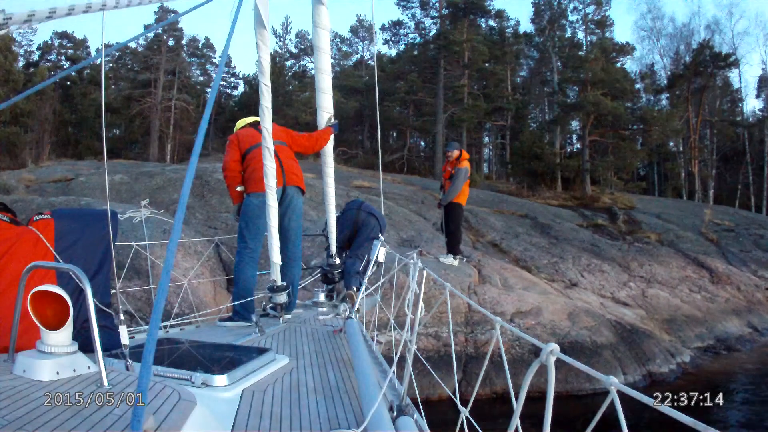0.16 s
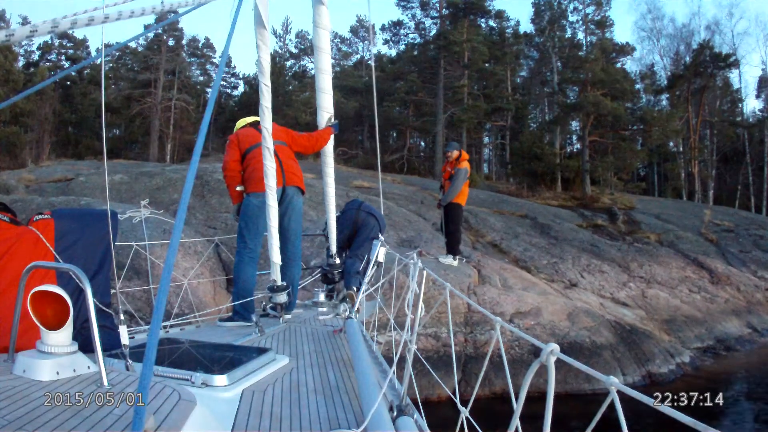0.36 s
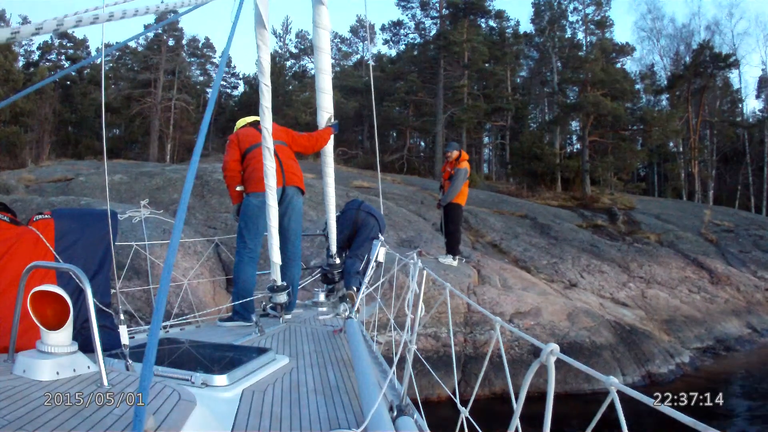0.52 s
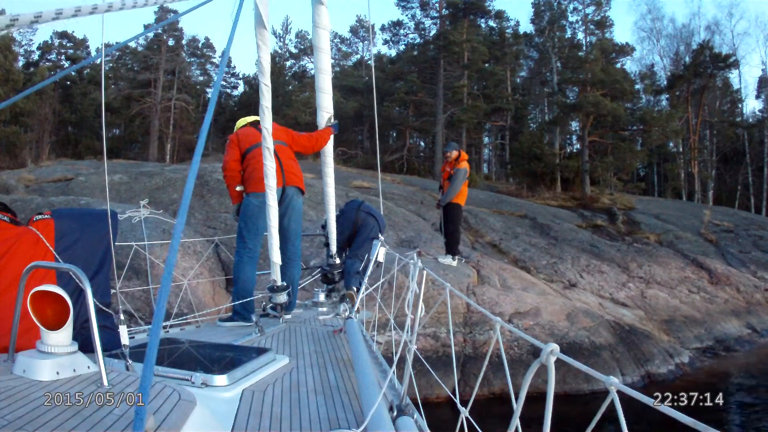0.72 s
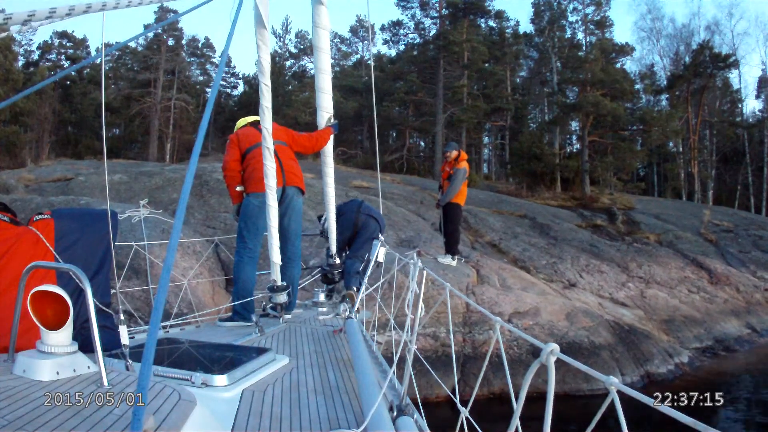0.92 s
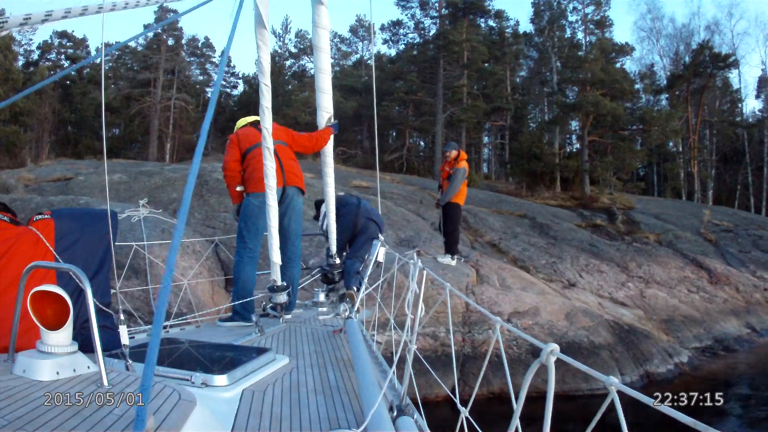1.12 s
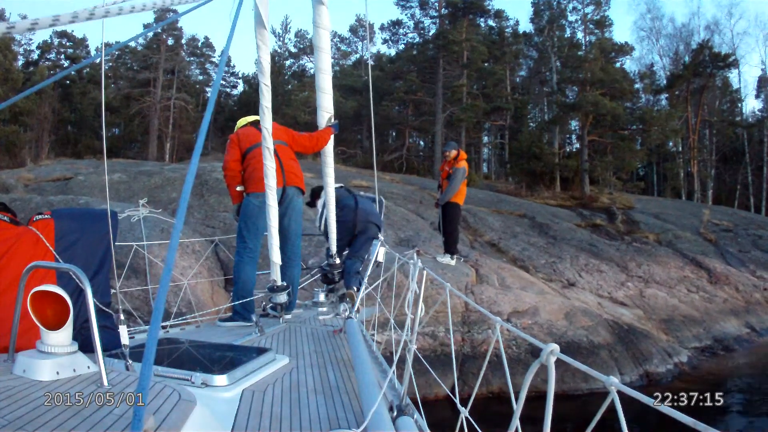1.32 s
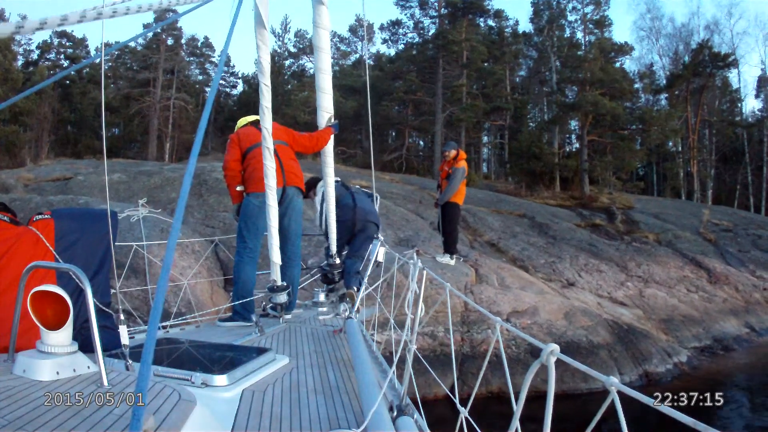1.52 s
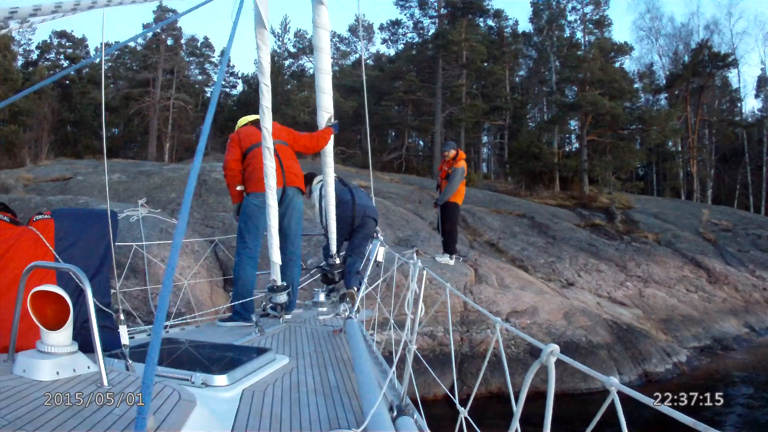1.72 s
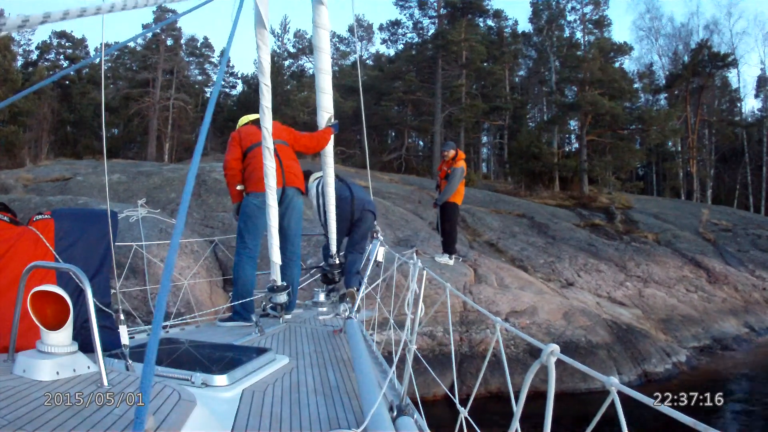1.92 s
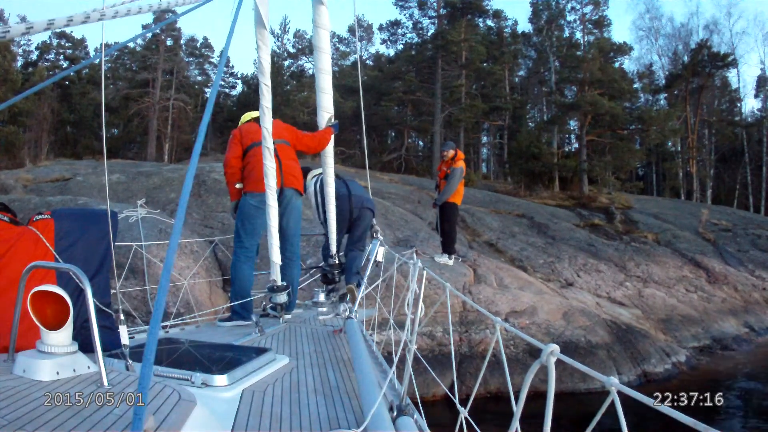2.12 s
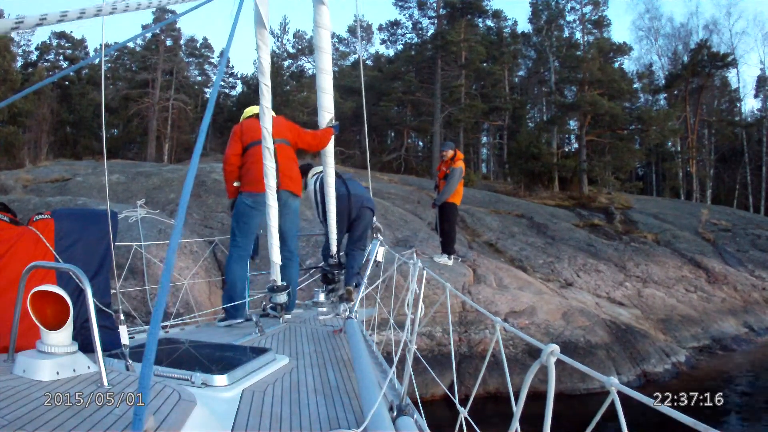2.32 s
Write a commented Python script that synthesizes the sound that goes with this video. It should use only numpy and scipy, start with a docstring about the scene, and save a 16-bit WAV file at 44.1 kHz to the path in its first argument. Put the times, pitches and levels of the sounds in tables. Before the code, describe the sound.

Gear thuds on a yacht's foredeck: a small metal tap over a low shudder, then heavy booming knocks, followed by scattered rail taps that thin out, heard close through the hull over faint water rumble and hiss.

```python
"""A metal tap over a low shudder comes first, then heavy thuds boom in a hull: gear handled on a yacht's foredeck,
heard through the hull by a camera fixed to the boat. Metal taps ring a rail and small parts tick.
Each blow is a click and a rattle exciting decaying modes; noise keeps hull, deck and rail sounding as they die away.
Behind them lie a faint water rumble of resonant noise and the camera's coloured hiss and sine whine."""
import sys
import numpy as np
from scipy import signal
from scipy.fft import rfft, irfft
from scipy.io import wavfile
from scipy.ndimage import uniform_filter1d

SR = 44100
rng = np.random.default_rng(int(sys.argv[2]) if len(sys.argv) > 2 else 0)


def master_out(mix):
    """Clip the mix to full scale and print it as 16-bit PCM to the path in sys.argv[1]."""
    frames = np.transpose(np.atleast_2d(mix))
    ceiling = np.clip(frames, -1, 1)
    pcm = np.round(ceiling * 32767).astype(np.int16)
    wavfile.write(sys.argv[1], SR, pcm)


def decibels_to_gain(level_db):
    """Convert a level in decibels to a linear amplitude gain (20 dB per decade)."""
    exponent = np.asarray(level_db, float) / 20
    return 10 ** exponent


N = 103635

# Deck panel modes: f/Hz, relative level/dB, t60/s
DECK = [(564.5, -3, 0.17), (616.4, 0.5, 0.19), (675, 3.5, 0.035), (729, 3, 0.028), (785, 3, 0.065),
        (821, -21, 0.039), (950, -11.5, 0.042), (1043, -23.5, 0.067), (1140, -21, 0.041), (1300, -17, 0.02),
        (1442, -8, 0.03), (1615, -3.5, 0.05), (1757, -6, 0.064), (1916, -18, 0.2), (1900, -51, 0.079)]
# Upper hull modes: f/Hz, relative level/dB, t60/s
HULL_UPPER = [(224, 1.5, 0.079), (257.1, -3, 0.64), (276.7, 3, 0.24), (341.5, -4.5, 0.47),
              (361.2, -1, 0.21), (455, -7.5, 0.12)]
# Rail modes, low cluster, upper cluster and long ring: f/Hz, relative level/dB, t60/s
RAIL_LOW = [(603, -8, .085), (670, -12, .05), (791, 0, .07), (835, -5, .045)]
RAIL_UPPER = [(1170, -12, .08), (1292, -4, .075), (1367, -11, .11), (1470, -5, .05), (1560, -2, .05),
              (1630, -2, .06), (1732, -3, .05), (1792, -4, .09), (1863, -1, .075), (1947, -2, .085),
              (2040, -14, .05)]
RAIL_RING = [(1562, 0, .3)]


def level(x, db):
    """Root-mean-square normalisation: scales to an rms level in dB re 1."""
    return x * decibels_to_gain(db) / np.sqrt(np.mean(x ** 2))


def curve(rows):
    """Amplitude envelope: rows of t/s, level/dB joined by straight lines in dB."""
    return decibels_to_gain(np.interp(np.arange(N) / SR, *np.array(rows).T))


def walk(per_s):
    """Low-passed noise: a random wander of rms 1, smoothed twice over 1/per_s seconds."""
    k = int(SR / per_s)
    smooth = uniform_filter1d(rng.standard_normal(N), k)
    return level(uniform_filter1d(smooth, k), 0)


def ring(x, hz, t60):
    """Damped oscillator: a complex pole gives one mode that falls 60 dB in t60 (5 ms at least)."""
    decay = np.log(1000) / (max(t60, .005) * SR)
    pole = np.exp(2j * np.pi * hz / SR - decay)
    return signal.lfilter([1], [1, -pole], x).imag


def passband(x, modes):
    """Band limitation: a structure passes little outside the span of its modes."""
    hz = np.array(modes)[:, 0]
    skirt = 1.0436  # frequency ratio by which the band exceeds the outer modes
    band = [hz.min() / skirt, hz.max() * skirt]
    return signal.sosfilt(signal.butter(4, band, "band", fs=SR, output="sos"), x)


def strike(modes, times, dbs, rattle_s, rattle_db):
    """Impact excitation: a click and a fading, grainy rattle drive the modes, scaled to each blow's peak level.

    rattle_s is the rattle's decay constant, rattle_db its mean energy re the click."""
    scatter_db, grain_db = 4.5, 4  # spread of mode levels from blow to blow, and of grain levels
    size = (len(times), 16384)
    span = np.arange(size[1])
    rattle_s = (np.ones(size[0]) * rattle_s)[:, None]
    grain_gain = np.repeat(rng.standard_normal((size[0], 256)), repeats=64, axis=1)  # 64 samples a grain
    grains = level(rng.standard_normal(size) * decibels_to_gain(grain_db * grain_gain), 0)
    fade = np.exp(-span / SR / rattle_s) / np.sqrt(rattle_s * SR / 2)  # unit energy
    push = grains * decibels_to_gain(np.reshape(rattle_db, (-1, 1))) * fade
    push[:, 0] += 1  # the click
    share = decibels_to_gain(scatter_db * rng.standard_normal((size[0], len(modes))))
    blows = sum(decibels_to_gain(db) * share[:, [k]] * ring(push, hz, t60) for k, (hz, db, t60) in enumerate(modes))
    blows = passband(blows, modes)
    blows = blows * decibels_to_gain(np.asarray(dbs))[:, None] / np.abs(blows).max(axis=1, keepdims=True)
    at = (np.asarray(times) * SR).astype(int)[:, None] + span
    return np.bincount(at.ravel(), blows.ravel(), N + size[1])[:N]


def stir(modes, gain):
    """Sustained random excitation: noise keeps the modes sounding under a gain over time."""
    tones = sum(decibels_to_gain(db) * ring(rng.standard_normal(N), hz, t60) for hz, db, t60 in modes)
    return passband(gain * level(tones, 0), modes)


def thuds():
    """Modal response to a blunt impact: a blow with a scrape makes deck panels knock and crackle."""
    # Thuds on the deck: t/s, peak level/dB, treble re peak level/dB, scrape decay constant/s; the faint row at
    # 1.798 s is a light tap, heard through the deck modes
    thud_rows = [(.222, -5.5, -24, 0.012), (0.248, -31, -16, 0.0067), (0.261, -15, -24.5, 0.029),
                 (.295, -19, -27, 0.021), (0.371, -14, -20.5, 0.007), (0.377, -8.5, -24, 0.014),
                 (0.397, -10.5, -25.5, 0.0081), (0.414, -11.5, -25, 0.0048), (.436, -18, -39, 0.047),
                 (0.473, -18, -24, 0.031), (0.496, -23, -38, 0.044), (0.687, -19, -22.5, 0.046),
                 (0.883, -29, -26.5, 0.013), (1.798, -32, -25, 0.0045), (2.304, -43.5, -28, 0.026),
                 (2.319, -35.5, -35, 0.023)]
    # Treble modes of the deck: f/Hz, relative level/dB, t60/s
    treble_modes = [(2650, -14, .02), (2920, -5, .04), (3203, 0, .035), (3400, -2, .03), (3737, -10, .02)]
    # Crackle modes of the deck: f/Hz, relative level/dB, t60/s (raised to 5 ms where shorter)
    crackle_modes = [(4600, 13, .004), (5130, 4, .004), (6300, -14, .003), (9900, -8, .003)]
    t, db, treble, scrape = np.array(thud_rows).T
    parts = ((DECK, 0), (HULL_UPPER, -15), (treble_modes, treble), (crackle_modes, treble - 9.5))
    return sum(strike(modes, t, db + share_db, scrape, rattle_db=14.5) for modes, share_db in parts)


def taps():
    """Modal participation: where the rail is hit sets each cluster's share; the long ring fades unevenly."""
    # Taps on the rail: t/s, peak level of the low cluster before the common -7 dB/dB,
    # then re that peak: upper cluster level/dB, long ring level/dB, treble level/dB
    tap_rows = [(0.116, -25.5, -5.5, -15, -19.5), (0.339, -32, 2, 5.5, -6), (0.436, -14.5, -5, -4, -14.5),
                (0.55, -13, 6.5, -10.5, -10), (0.669, -26, -1, -4, -12.5), (0.713, -8, 5.5, -7.5, -9),
                (0.835, -33, -5, -0.5, -9.5), (0.943, -36.5, -6, 2, -15), (1.039, -13, 2, -13, -16),
                (1.15, -25, 2.5, -12.5, -16.5), (1.231, -12.5, 4.5, -17, -10.5), (1.31, -43.5, 7.5, 5, -24),
                (1.339, -40.5, 9, -4.5, -20), (1.405, -20, 2.5, -9.5, -20), (1.556, -41.5, -4, -14, -15),
                (1.592, -18, 0.5, -16, -17), (1.656, -18.5, 0, -17.5, -22.5), (1.805, -21, 0, -11, -20),
                (1.852, -28.5, -5.5, -7.5, -14), (1.885, -45.5, 10, -15, -5),
                (2.012, -36.5, -1.5, -9.5, -12), (2.18, -57.5, 9, 11.5, -18), (2.226, -38, -2.5, -7.5, -14)]
    # Treble modes of the rail: f/Hz, relative level/dB, t60/s
    treble_modes = [(2945, -4, .06), (3100, -1, .05), (3240, 0, .04), (3400, 0, .03), (3550, -3, .025),
                    (3900, -14, .015), (4300, -11, .02), (4700, -12, .02), (4950, -11, .025),
                    (5330, -9, .03), (5520, -9, .04), (6270, -15, .02)]
    t, db, upper, long, treble = np.array(tap_rows).T
    soft = db < -42  # brushes, more rattle than click
    rattle_s = np.where(soft, .025, .0085)
    blur_db = 12 * soft
    low = strike(RAIL_LOW, t, db, rattle_s, blur_db - 4)
    clusters = ((RAIL_UPPER, upper), (treble_modes, treble))
    bright = sum(strike(modes, t, db + share_db, rattle_s, blur_db + 2.5) for modes, share_db in clusters)
    tail = strike(RAIL_RING, t, db + long, .0085, rattle_db=-12)
    tail = tail * decibels_to_gain(2.5 * walk(per_s=45))
    return decibels_to_gain(-7) * (low + bright + tail)


def ticks():
    """Resonance of small bodies: loose parts tick in high, short modes, a little to one side by level difference."""
    # Ticks: t/s, peak level before panning/dB, top resonance re that peak/dB
    tick_rows = [(0.2215, -51, -15), (0.235, -34.5, -14.5), (0.339, -41.5, -8.5), (0.3745, -52, -9),
                 (0.398, -43.5, -2.5), (0.437, -36.5, -21), (0.49, -48, -9), (0.5033, -35, -11),
                 (0.669, -46.5, 0.5), (0.8365, -49, -15)]
    # Main modes of a small part: f/Hz, relative level/dB, t60/s
    part_modes = [(4250, -4, .012), (4950, -6, .008), (5600, -5, .01), (6800, -9, .005)]
    # Its top modes: f/Hz, relative level/dB, t60/s (raised to 5 ms where shorter)
    top_modes = [(8700, -8, .005), (9600, -3, .012), (13200, -8, .004)]
    t, db, top = np.array(tick_rows).T
    body = strike(part_modes, t, db, .012, rattle_db=-2.5)
    bright = strike(top_modes, t, db + top, .012, rattle_db=17)
    pan_db = np.array([[1], [-1]])  # left, right
    return (body + bright) * decibels_to_gain(pan_db)


def boom():
    """Beating: the two lowest hull modes sound together, each wavering in level and frequency, at rms 1."""
    # Lowest hull modes: f/Hz, relative level/dB, rms frequency waver/Hz
    low_modes = [(134, 0, 4), (161, -2, 7)]
    waver_db, waver_per_s = 2.5, 14
    tones = 0
    for hz, db, waver_hz in low_modes:
        gain = decibels_to_gain(db + waver_db * walk(waver_per_s))
        cycles = rng.random() + np.cumsum(hz + waver_hz * walk(waver_per_s)) / SR
        tones = tones + gain * np.sin(2 * np.pi * cycles)
    return level(tones, 0)


def hull_shudder():
    """Forced modal vibration: the low boom, noisy hull modes and a hum near 92 Hz follow their envelopes."""
    # Shudder of the low hull: t/s, level/dB
    shudder_rows = [(0.0, -30), (0.12, -34), (0.2, -46), (0.222, -42), (0.24, -19), (0.28, -18),
                    (0.36, -30), (0.39, -20), (0.41, -13), (0.44, -14), (0.48, -20), (0.5, -17), (0.6, -33),
                    (0.66, -27), (0.74, -20), (0.8, -22), (0.88, -38), (0.91, -30), (0.98, -39),
                    (1.04, -34), (1.11, -41.5), (1.28, -35.5), (1.33, -45), (1.41, -35.5), (1.47, -42.5),
                    (1.6, -40.5), (1.79, -46), (2.05, -50), (2.35, -55)]
    # Shudder of the upper hull modes: t/s, level/dB
    upper_rows = [(0.0, -33), (0.18, -48), (0.25, -32.5), (0.36, -34), (0.39, -24), (0.65, -42),
                  (0.72, -34), (0.82, -45.5), (1.11, -56.5), (1.79, -57.5), (2.03, -78), (2.35, -94)]
    # Broad low hull modes: f/Hz, relative level/dB, t60/s
    broad_modes = [(116.5, 0.5, 0.23), (148.3, -5, 0.5), (191.6, -10.5, 0.25)]
    # Wavering hum mode: f/Hz, relative level/dB, t60/s
    hum_modes = [(91.47, 0, 0.9)]
    # Hum envelope: t/s, level/dB
    hum_rows = [(0.0, -41), (0.67, -38), (1.05, -43), (1.13, -50.5), (1.25, -44), (2.35, -69)]
    gain = curve(shudder_rows)
    low = gain * boom() + decibels_to_gain(-9) * stir(broad_modes, gain)
    return low + stir(HULL_UPPER, curve(upper_rows)) + stir(hum_modes, curve(hum_rows))


def rustle():
    """Random excitation of resonances: noise makes the deck and rail modes rustle."""
    # Rustle envelope: t/s, level of deck and low rail/dB
    rustle_rows = [(0.0, -32.5), (0.27, -87), (0.38, -34), (0.41, -22), (0.51, -42.5), (0.91, -49.5),
                   (1.31, -54), (1.77, -58), (2.0, -60.5), (2.35, -71)]
    gain = curve(rustle_rows)
    low = stir(RAIL_LOW + DECK, gain)
    return low + decibels_to_gain(-19.5) * stir(RAIL_UPPER, gain) + decibels_to_gain(-21) * stir(RAIL_RING, gain)


def water():
    """Resonant filtering of noise: water rumbles around 32 Hz, almost alike left and right."""
    # Rumble envelope: t/s, level/dB
    rumble_rows = [(0.0, -46), (0.56, -40), (0.58, -47), (0.69, -41), (1.27, -45.5), (1.49, -48),
                   (1.52, -49), (2.35, -49)]
    centre_hz, width_hz, side_db = 32.2, 18.7, -22.5
    peak = signal.iirpeak(centre_hz, centre_hz / width_hz, SR)
    mid, side = level(signal.lfilter(*peak, rng.standard_normal((2, N))), 0)
    return curve(rumble_rows) * (mid + decibels_to_gain(side_db) * side * np.array([[1], [-1]]))


def camera():
    """Spectral shaping: coloured hiss, mostly alike in both channels, and a thin sine whine."""
    # Hiss spectrum: f/Hz, relative level/dB
    hiss_rows = [(180, -18), (300, 1), (326, -39), (438, -37), (491, 13.5), (886, -33), (931, -1),
                 (1380, -16), (2490, 2), (15200, -0.5)]
    hiss_db, side_db = -62, -15  # rms of the common part, and of the opposed part re it
    whine_hz, whine_db = 13950, -81.5  # whine level is rms
    hz = np.arange(N // 2 + 1) * SR / N + 1  # 1 Hz up, to keep the logarithm finite
    table_hz, table_db = np.array(hiss_rows).T
    gain = decibels_to_gain(np.interp(np.log(hz), np.log(table_hz), table_db))
    mid, side = irfft(rfft(rng.standard_normal((2, N))) * gain, N)
    whine = decibels_to_gain(whine_db) * np.sqrt(2) * np.sin(2 * np.pi * whine_hz * np.arange(N) / SR)
    return level(mid, hiss_db) + whine + level(side, hiss_db + side_db) * np.array([[1], [-1]])


def scene():
    """Superposition: blows, hull, deck and rail are alike left and right; ticks, water and hiss differ a little."""
    return thuds() + taps() + ticks() + hull_shudder() + rustle() + water() + camera()


def band_limit(x):
    """A steep low-pass at the top of the band."""
    return signal.sosfilt(signal.butter(12, 15310, fs=SR, output="sos"), x)


def record(dry):
    """Low-pass filtering: a steep elliptic filter cuts the top above 15310 Hz."""
    cut = signal.sosfilt(signal.ellip(10, .1, 70, 15310, fs=SR, output="sos"), dry)
    return band_limit(cut)


dry = scene()
out = record(dry)
master_out(out)
```